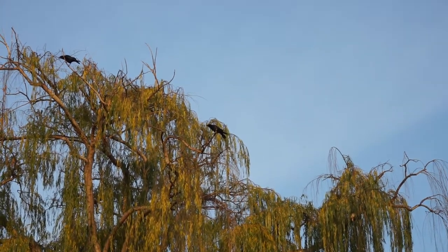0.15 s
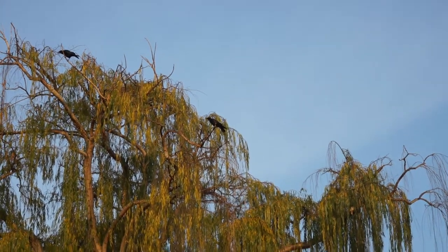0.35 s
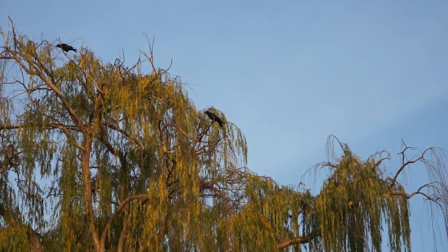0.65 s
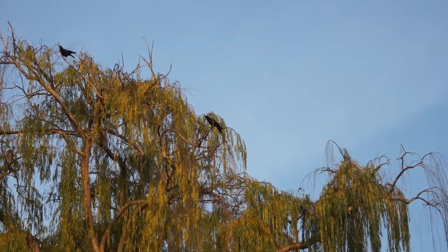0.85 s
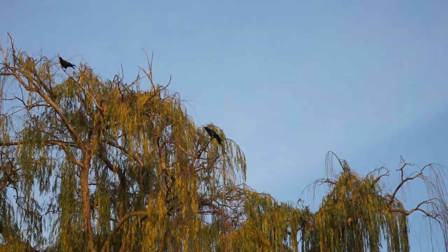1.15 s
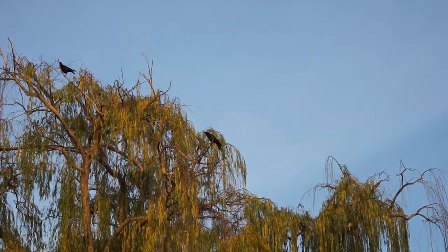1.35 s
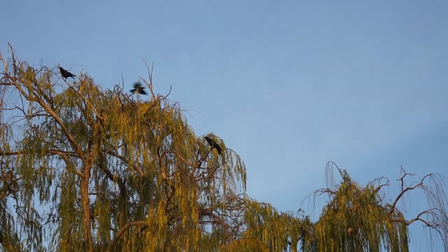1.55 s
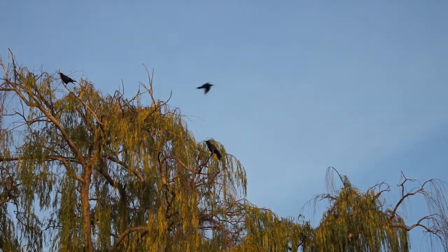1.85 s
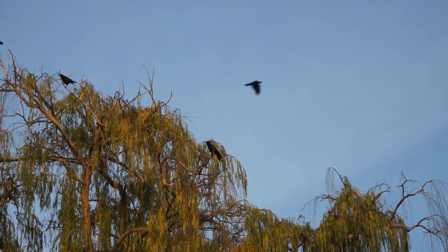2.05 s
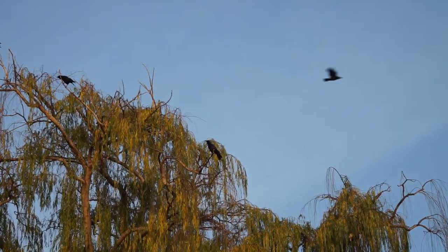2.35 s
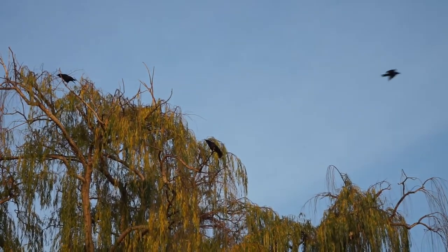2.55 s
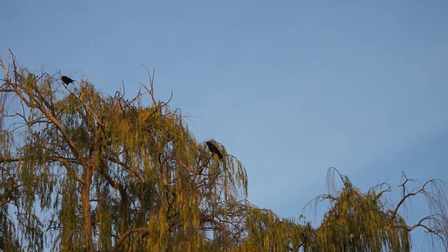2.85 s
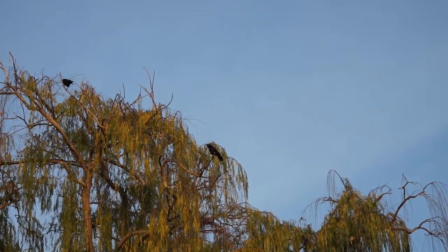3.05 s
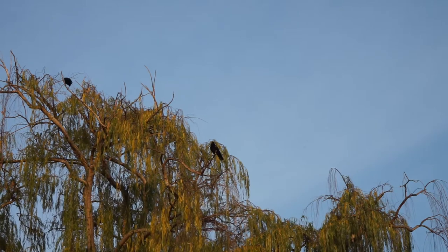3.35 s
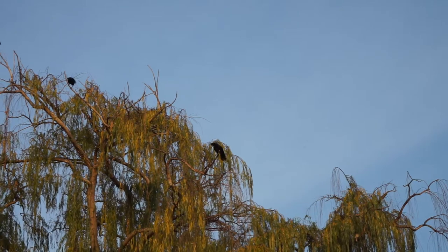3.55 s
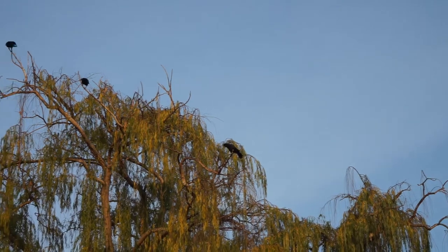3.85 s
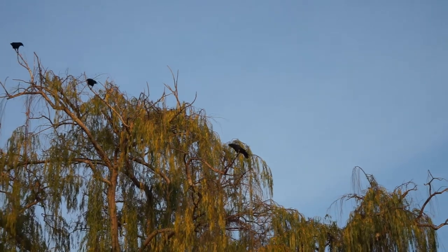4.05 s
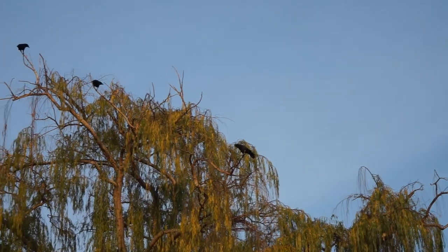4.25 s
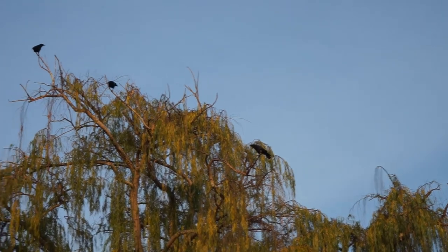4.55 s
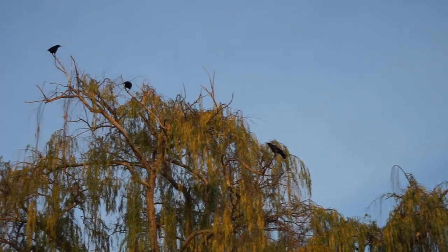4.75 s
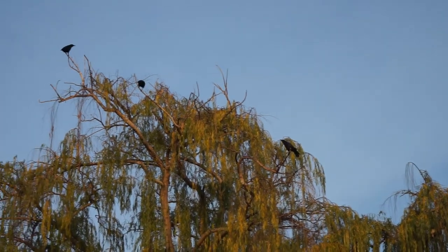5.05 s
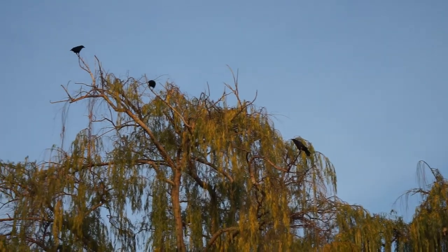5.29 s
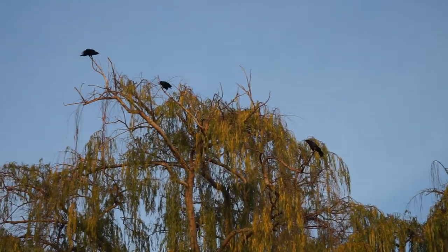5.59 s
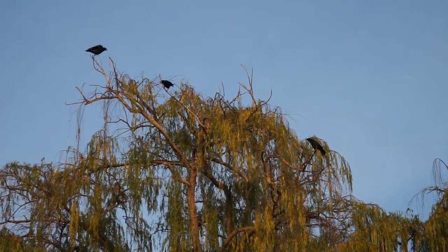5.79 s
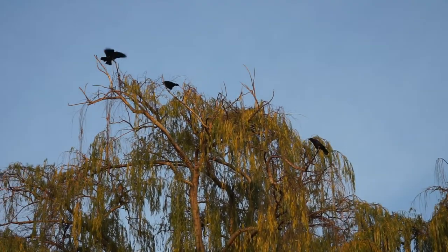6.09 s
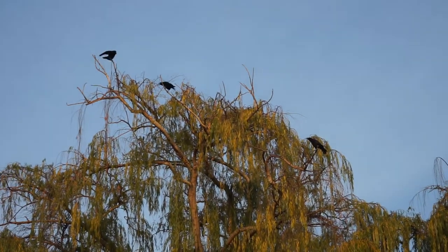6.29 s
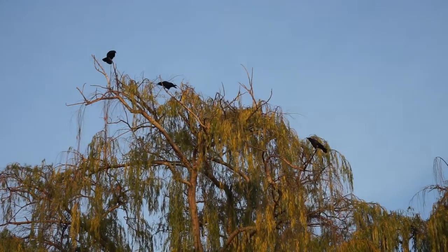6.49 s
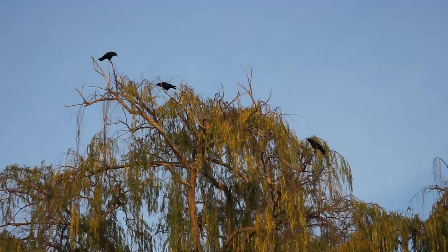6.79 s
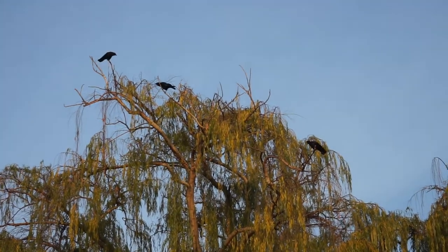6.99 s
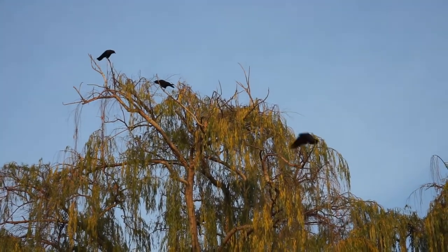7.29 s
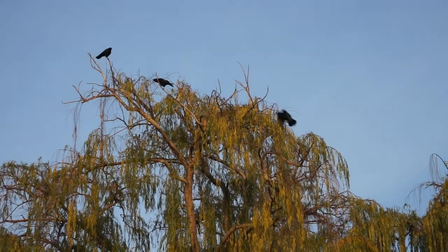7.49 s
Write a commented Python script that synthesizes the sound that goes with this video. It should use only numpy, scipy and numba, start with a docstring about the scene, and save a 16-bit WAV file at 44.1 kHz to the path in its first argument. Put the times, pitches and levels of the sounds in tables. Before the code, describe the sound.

Two crows call from a tall tree: one lower, rough and sagging in pitch, the other higher, brighter and stronger with a deep rattle. Roughly two seconds of soft town rumble and faint swooping chirps come first, then quick overlapping exchanges, slower lone hoarse caws, and a final exchange. Stationary outdoor microphone some distance away, birds near centre and barely left, with only faint reflections from ground and trees.

```python
"""Two crows in a park

Two crows, one hoarse and one shrill, caw at each other from a tall willow; a small bird chirps, mostly in the pauses.
Each caw is a row of uneven voice pulses, chopped by a slower rattle and rung through throat and beak.
Each chirp is a thin swooping whistle. The ground and the trees add a faint, short echo to the birds.
Far behind, filtered noise makes a town rumble that swells once, under a faint, wider hiss."""
import sys
import numpy as np
from scipy import signal
from scipy.fft import rfft, irfft
from scipy.io import wavfile
from scipy.ndimage import uniform_filter1d
from numba import njit

SR = 44100
rng = np.random.default_rng(int(sys.argv[2]) if len(sys.argv) > 2 else 0)


def bounce(signal):
    """Save signal as a 16-bit WAV file at the path given by the first command-line argument."""
    frames = np.transpose(np.atleast_2d(signal))
    limited = np.clip(frames, -1, 1)
    pcm = np.round(limited * 32767).astype(np.int16)
    wavfile.write(sys.argv[1], SR, pcm)


N = 336483  # length of the scene in samples


def hoarse_crow():
    """The lower voice: uneven pulses, a narrow throat ring, and a pitch that collapses at the end."""
    # One caw a row: (start [s], rise to the top pitch [s], length [s], top pitch [Hz], level [dB],
    # treble [dB], extra throat ring with the beak wide open [dB])
    caws = [(2.216, 0.051, 0.32, 542.3, -28, 3.5, 1.5), (2.80, 0.076, 0.36, 543.4, -29.5, 1.5, 4),
            (3.33, 0.053, 0.31, 552, -29, 2.5, 5), (3.914, 0.053, 0.34, 561, -30, 4, 2.5),
            (4.655, 0.075, 0.34, 516.3, -29, 0, 2), (5.455, .07, 0.32, 520.3, -31, 3, 0.5),
            (6.215, 0.093, 0.34, 543.3, -28.5, 6.5, 6), (7.332, 0.052, 0.3, 558.3, -26.5, 9.5, -1.5)]
    # Resonances of windpipe and beak: (centre [Hz], width of the first filter [Hz], level [dB],
    # rise over the caw [share of the centre])
    beak = [(497, 780, -21.5, -0.18), (1070, 170, -9.5, -.33), (1770, 330, -8, -.05), (2080, 330, -8, -.12),
            (2840, 400, -23.5, -0.18), (3500, 270, -13.5, 0.1), (4470, 590, -22.5, 0.07),
            (6237, 950, -21.5, -0.0044), (8570, 3360, -37, 0.018)]
    manner = dict(
        scoop=.2, sag=.25, collapse=.23,  # shares of the top pitch
        hold=.58,  # share of the time after the rise
        attack_db=9.5, sag_db=0, release_db=16,
        throat_hz=1360, throat_scoop=0.076, gape_lift_hz=166, gape_span=0.24,
        ring_db=7, gape_damp_db=9, weak_damp_db=5.5,
        rattle_start_hz=93.93, rattle_end_hz=47.95)
    # Each pair: (beak wide open, beak shut); depth from 0 to 1, jitter as a share of the pulse period
    roughness = dict(depth=(.3, .48), jitter=(.064, .052))
    return crow(caws, manner, roughness, beak, throat_width_hz=210, scatter_db=1.5, air=.22,
                wobble=.075, rattle_drift=.09)


def shrill_crow():
    """The higher, louder voice: a broad throat ring and a deep rattle."""
    # One caw a row: (start [s], rise to the top pitch [s], length [s], top pitch [Hz], level [dB],
    # treble [dB], extra throat ring with the beak wide open [dB])
    caws = [(2.667, 0.078, 0.29, 609.3, -23, 0.84, 0), (3.141, 0.07, 0.26, 631.5, -21, 1, 0.59),
            (3.558, 0.068, 0.23, 611.7, -22.5, 0.1, 0.29), (4.135, 0.06, 0.23, 592.5, -24.5, 0, 0.54),
            (6.953, 0.078, 0.37, 601.6, -21.5, 0, 0.6), (7.562, 0.062, .27, 612, -24, 0, -0.68)]
    # Resonances of windpipe and beak: (centre [Hz], width of the first filter [Hz], level [dB],
    # rise over the caw [share of the centre])
    beak = [(504, 190, -18.5, -0.096), (1280, 61, -14, -0.089), (2273, 500, -7.5, -0.15),
            (2990, 450, -11, 0.28), (3647, 420, -9, 0.11), (4730, 810, -13, 0.038),
            (6600, 1610, -12, 0.021), (9080, 2330, -19, -0.021)]
    manner = dict(
        scoop=.25, sag=.29, collapse=0.029,  # shares of the top pitch
        hold=.66,  # share of the time after the rise
        attack_db=15.5, sag_db=6, release_db=17.5,
        throat_hz=1350, throat_scoop=.01, gape_lift_hz=323, gape_span=0.7,
        ring_db=7, gape_damp_db=4.5, weak_damp_db=4,
        rattle_start_hz=98.3, rattle_end_hz=58.15)
    # Each pair: (beak wide open, beak shut); depth from 0 to 1, jitter as a share of the pulse period
    roughness = dict(depth=(.54, .42), jitter=(.028, .05))
    return crow(caws, manner, roughness, beak, throat_width_hz=500, scatter_db=1.5, air=.25,
                wobble=.08, rattle_drift=.08)


def crow(caws, manner, roughness, beak, throat_width_hz, scatter_db, air, wobble, rattle_drift):
    """The rattle chops and bends the voice pulses; throat and beak are filters that ring with them."""
    out = np.zeros(N + SR)
    for start, rise_s, length, top_hz, db, treble_db, top_ring_db in caws:
        n = int(length * SR)
        t = np.arange(n) / SR
        progress = np.linspace(0, 1, n)
        pitch, effort_db, gape, throat_hz, ring_db, rattle_hz = caw_arch(t, rise_s, length, **manner)
        depth, jitter = (shut + (wide - shut) * gape
                         for wide, shut in (roughness["depth"], roughness["jitter"]))

        drifting_hz = rattle_hz * (1 + rattle_drift * walk(71.45, SR)[:n])
        rattle = np.sin(2 * np.pi * (rng.random() + np.cumsum(drifting_hz) / SR))
        chop = depth * rattle
        source = syrinx(top_hz * pitch * (1 + wobble * chop), jitter, scatter_db, air)

        # Two filters in a row ring as the throat, the second one broader
        throat = svf(source * (1 + chop), throat_hz, throat_width_hz)
        throat = svf(throat, throat_hz, 1.64 * throat_width_hz)
        voice = throat * undb(ring_db + gape * top_ring_db)

        rasp = source * (1 + 0.63 * chop)  # the overtones throb less than the throat
        bright_db = treble_db - 5 * np.exp(-t / 0.11)  # the pulses sharpen as the pressure builds
        for k, (hz, width, mode_db, rise) in enumerate(beak):
            centre = hz * (1 + rise * (progress - .5))
            mode = svf(svf(rasp, centre, 1. * width), centre, 2. * width)
            sign = -(-1) ** k  # neighbouring resonances have opposite signs
            # Brightness acts fully from 5000 Hz up, and less below
            voice = voice + sign * undb(mode_db + bright_db * min(hz / 5000, 1)) * mode

        # Even out the loudness, then give the caw its own swell and fade
        loudness = np.sqrt(uniform_filter1d(voice ** 2, int(0.03 * SR)) + 1e-12)
        edges = np.clip(np.minimum(progress / 0.0061, (1 - progress) / 0.015), 0, 1)
        out[int(start * SR):][:n] += voice / loudness * edges * undb(db + effort_db)
    return out[:N]


def caw_arch(t, rise_s, length, scoop, sag, collapse, hold, attack_db, sag_db, release_db, throat_hz,
             throat_scoop, gape_lift_hz, gape_span, ring_db, gape_damp_db, weak_damp_db,
             rattle_start_hz, rattle_end_hz):
    """One push of air: the beak opens as the pitch climbs, both ease off, then the voice gives out."""
    attack = np.clip(1 - t / rise_s, 0, 1)  # falls from 1 to 0 during the rise
    closing = np.clip((t - rise_s) / (length - rise_s), 0, 1)  # grows from 0 to 1 after it
    release = np.clip((closing - hold) / max(1 - hold, .01), 0, 1)  # grows from 0 to 1 after the hold
    gape = np.exp(-((attack ** 2 + closing) / gape_span) ** 2)  # 1 is wide open
    pitch = 1 - scoop * attack - sag * closing - collapse * release
    effort_db = -attack_db * attack ** 2.58 - sag_db * closing - release_db * release ** 1.11
    # The throat rings less while the beak gapes and while the push is weak
    ring = ring_db - gape_damp_db * gape - weak_damp_db * (attack + release)
    rattle_hz = rattle_start_hz * (rattle_end_hz / rattle_start_hz) ** (t / length)
    throat = (throat_hz + gape_lift_hz * gape) * (1 - throat_scoop * attack)
    return pitch, effort_db, gape, throat, ring, rattle_hz


def syrinx(hz, jitter, scatter_db, air):
    """The voice organ: a sharp pulse a cycle, uneven in timing and size, with a puff of air behind it."""
    i = np.arange(len(hz))
    turns = np.cumsum(hz) / SR
    at = np.interp(np.arange(1, int(turns[-1])), turns, i)  # pulse places in samples
    chance = rng.standard_normal((400, 2))[:len(at)]
    at = at + chance[:, 0] * (jitter * SR / hz)[at.astype(int)]
    size = undb(scatter_db * chance[:, 1:])
    # A short windowed sinc lets a pulse fall between two samples
    taps = at.astype(int)[:, None] + np.arange(-5, 7)
    offset = taps - at[:, None]
    shape = np.sinc(offset) * np.sinc(offset / 6)
    places = np.clip(taps, 0, len(i) - 1)
    pulses = np.bincount(places.ravel(), (shape * size).ravel(), len(i))
    puffs = np.exp(-(turns % 1) / 1.7) * rng.standard_normal(len(i))
    return unit(pulses) + air * unit(puffs)


@njit
def svf(x, hz, width):
    """A resonance (band-pass filter) with a moving centre, where its gain is 1."""
    y, band, low = np.empty(len(x)), 0., 0.
    for i in range(len(x)):
        g = np.tan(np.pi * hz[i] / SR)
        damping = width / hz[i]
        v = (band + g * (x[i] - low)) / (1 + g * (g + damping))
        band = 2 * v - band
        low = low + 2 * g * v
        y[i] = damping * v
    return y


def small_bird():
    """Thin whistles: each note is a sine that swoops up to its top pitch and down again."""
    # One note a row: (time of the top [s], length [s], top pitch [Hz], level [dB])
    chirps = [(0.434, .07, 5260, -53.5), (0.459, .04, 3820, -55), (0.484, .035, 3480, -56),
              (0.526, .06, 3850, -55), (1.152, .035, 3800, -65), (1.192, .045, 3880, -62),
              (1.204, .03, 5620, -60.5), (1.285, .035, 6630, -65), (1.43, .07, 3800, -66),
              (1.478, .035, 3850, -65), (1.53, .04, 4000, -62), (1.565, .035, 4450, -61),
              (1.737, .06, 5000, -51), (1.778, .08, 4270, -56.5), (2.585, .046, 4930, -52),
              (2.638, 0.031, 6000, -52.5), (6.04, 0.025, 5230, -70), (6.695, .06, 3470, -64),
              (6.79, .04, 3500, -63), (6.827, .03, 5970, -52.5), (6.874, .045, 4100, -69)]
    base_hz = 2653  # the swoop leans towards this pitch on both sides
    peak_share = .3  # half-width of the pitch peak as a share of the note
    out = np.zeros(N)
    for top_s, length, top_hz, db in chirps:
        n = int(length * SR)
        swoop = 1 / (1 + (np.linspace(-.5, .5, n) / peak_share) ** 2)
        hz = base_hz + (top_hz - base_hz) * swoop
        hz = hz * (1 + 0.017 * walk(463, SR)[:n])  # a slight random quiver
        whistle = unit(np.sin(2 * np.pi * np.cumsum(hz) / SR))
        note = whistle * signal.windows.tukey(n, .5)
        out[int((top_s - length / 2) * SR):][:n] += note * undb(db)
    return out


def park(x, near_db, near_t60, far_db, far_t60, width):
    """Quick scatter from ground and branches, then a duller tail from trees; the treble spreads widest."""
    t = np.arange(SR) / SR
    near, far = rng.standard_normal((2, 2, SR))
    # Each t60 is the time [s] in which an echo fades by 60 dB
    near = near * undb(-60 * t / near_t60) * (t > .001)
    dull = signal.butter(1, 2500, fs=SR, output="sos")
    far = signal.sosfilt(dull, far) * undb(-60 * t / far_t60) * (t > .02)
    mid, side = (undb(near_db) * unit(near) + undb(far_db) * unit(far)) / np.sqrt(SR)
    treble = signal.butter(1, 4000, "high", fs=SR, output="sos")
    side = width * signal.sosfilt(treble, side)
    echo = np.array([mid + side, mid - side])  # left and right
    return x + signal.fftconvolve(x[None], echo, axes=1)[:, :N]


def town(flicker_db, swell_db):
    """Distant traffic as filtered noise: a swelling rumble, nearly alike in both ears, under a wider hiss."""
    # Tone of the noise: (frequency [Hz], relative level per Hz [dB])
    tone = [(15, -42), (25, -17), (64, -7.5), (83, -2.5), (311, -20), (467, -19), (517, -17.5),
            (905, -18.5), (977, -20), (2040, -36.5), (2440, -44.5), (5520, -48.5), (11000, -54),
            (14300, -94), (22000, -120)]
    # Stereo width: (frequency [Hz], level of side minus mid [dB])
    side_tone = [(60, -21), (110, -36), (190, -18), (340, -14.5), (600, -9.5), (1060, -3.5), (1880, 1),
                 (3340, 2), (5930, 0.5), (10500, 0)]
    hz = np.fft.rfftfreq(N, 1 / SR)
    mid, side = (rfft(rng.standard_normal(N)) * colour(tone, hz) for _ in range(2))
    both = mid + np.array([[1], [-1]]) * side * colour(side_tone, hz)
    bass = 1 / (1 + (hz / 230) ** 4)  # the rumble lies below about 230 Hz
    low, high = (irfft(both * share, N) for share in (bass, 1 - bass))

    # The rumble stands at -38 dB, then grows once by 2.5 dB around 5.4 s and ebbs
    swell = np.exp(-((np.arange(N) / SR - 5.4) / 1.16) ** 2)
    rumble = unit(low) * undb(-38 + 2.5 * swell)

    # -36 dB is the level for rumble and hiss together; only the hiss above the bass is used
    hiss_db = -36 + swell_db * walk(1.45, N) + flicker_db * walk(14, N)
    hiss = high / np.std(low + high) * undb(hiss_db)
    return rumble + hiss


def colour(table, hz):
    """Gain at each frequency, read from a table of (frequency [Hz], level [dB]) on a log-frequency axis."""
    f, db = np.transpose(table)
    return undb(np.interp(np.log(hz + 1), np.log(f), db))


def walk(rate, size):
    """Slow random wandering: values held for 1 / rate seconds, smoothed twice; spread near 1."""
    k = max(int(SR / rate), 1)
    steps = np.repeat(rng.standard_normal(size // k + 1), k)
    return 1.325 * uniform_filter1d(uniform_filter1d(steps, k), k)[:size]


def undb(db):
    """Decibels to gain."""
    return 10 ** (np.asarray(db) / 20)


def unit(x):
    """Scale to an average (rms) level of 1."""
    return x / np.sqrt(np.mean(x ** 2) + 1e-18)


def scene():
    """The birds in the trees over the town; everything is a little louder on the left."""
    crows = park(hoarse_crow() + shrill_crow(), near_db=-6.0, near_t60=.085,
                 far_db=-21.5, far_t60=0.62, width=1.46)
    chirps = park(small_bird(), near_db=-3, near_t60=0.082, far_db=-14.5, far_t60=.6, width=2.6)
    traffic = town(flicker_db=.6, swell_db=.35)
    return (crows + chirps + traffic) * undb([[1.5], [-1.5]])  # left up, right down [dB]


def record(dry):
    """A steep low-pass filter removes the top octave, above 11080 Hz."""
    return signal.sosfilt(signal.ellip(12, .2, 80, 11080, fs=SR, output="sos"), dry)


dry = scene()
out = record(dry)
bounce(out)
```